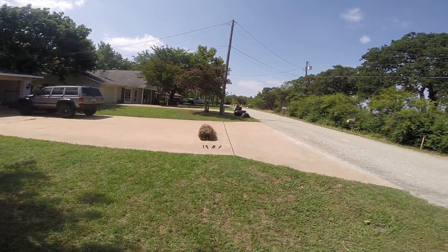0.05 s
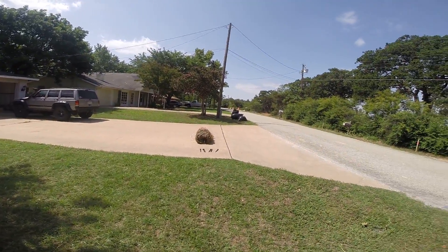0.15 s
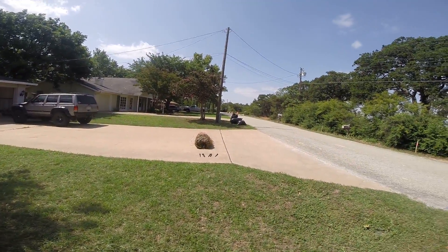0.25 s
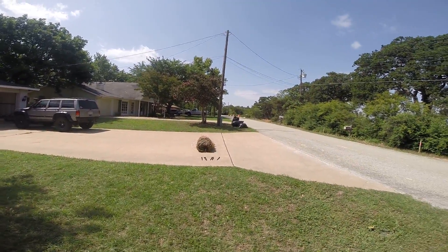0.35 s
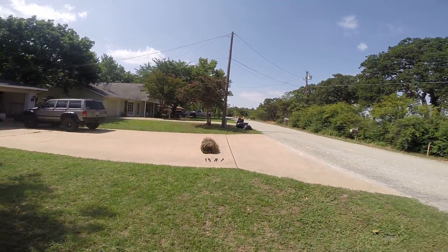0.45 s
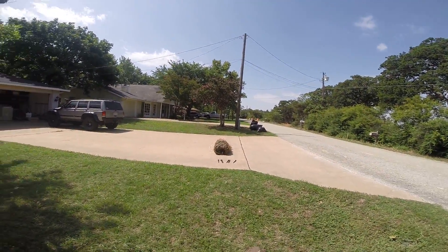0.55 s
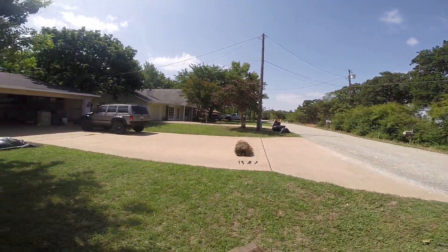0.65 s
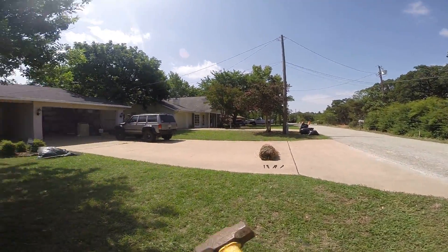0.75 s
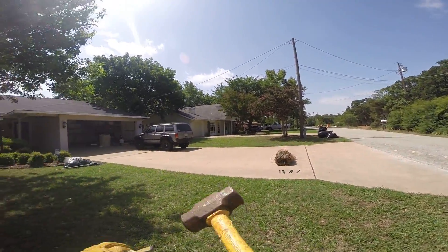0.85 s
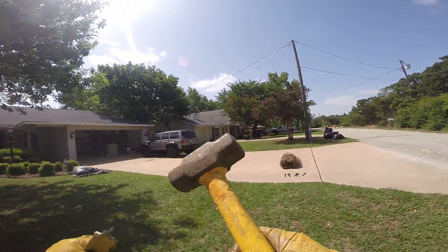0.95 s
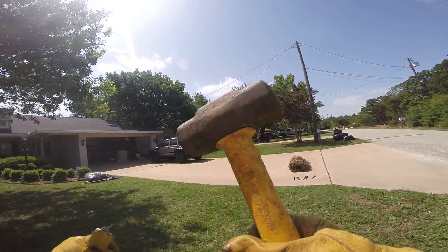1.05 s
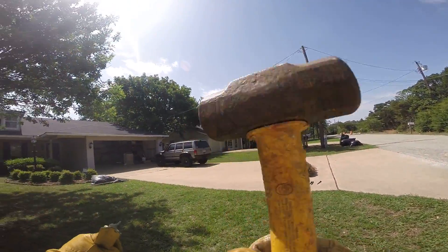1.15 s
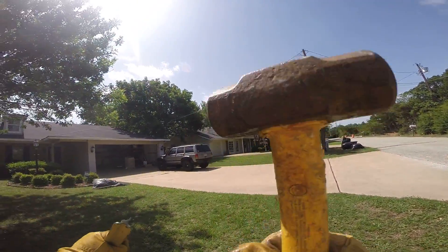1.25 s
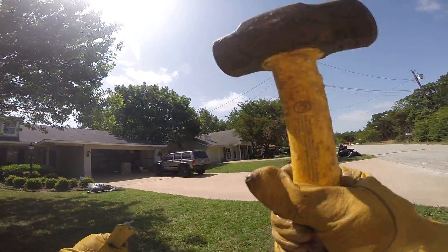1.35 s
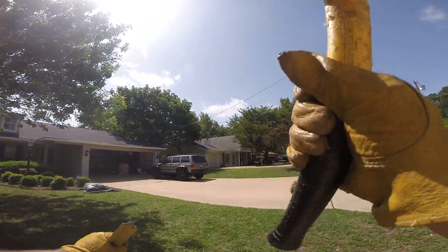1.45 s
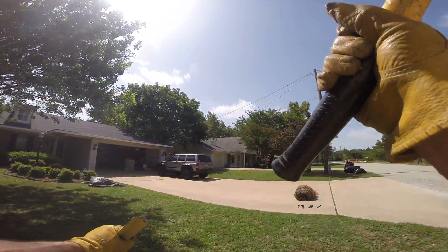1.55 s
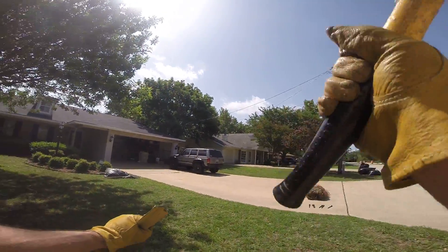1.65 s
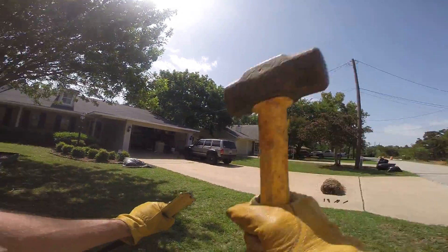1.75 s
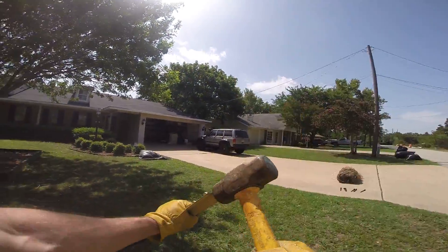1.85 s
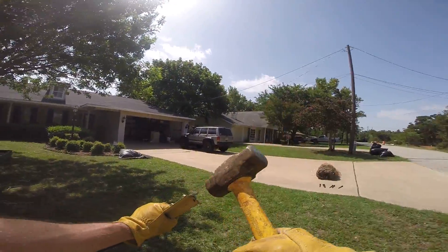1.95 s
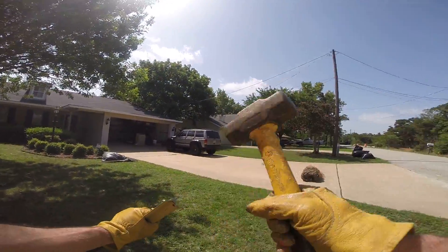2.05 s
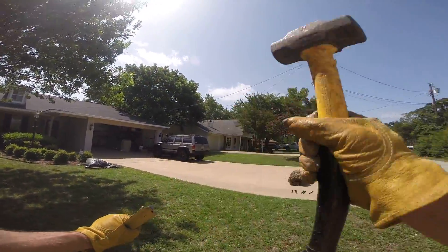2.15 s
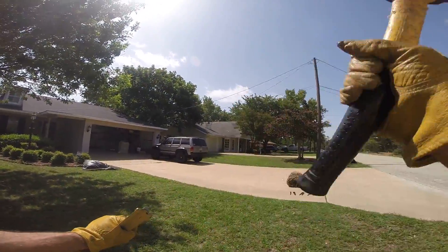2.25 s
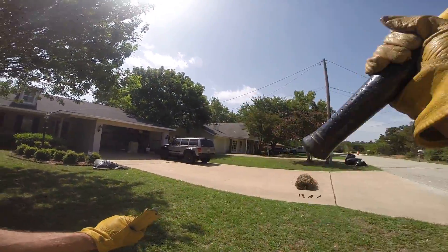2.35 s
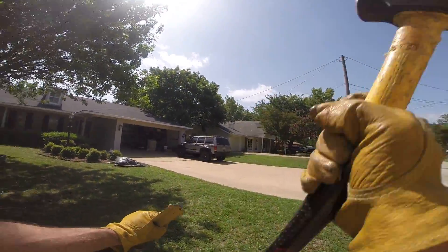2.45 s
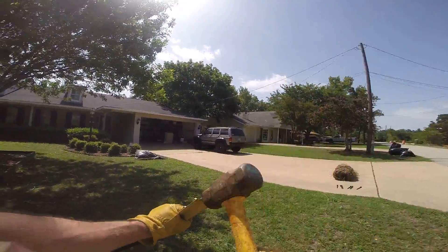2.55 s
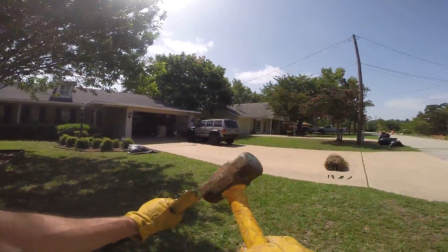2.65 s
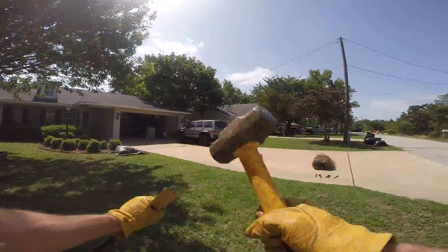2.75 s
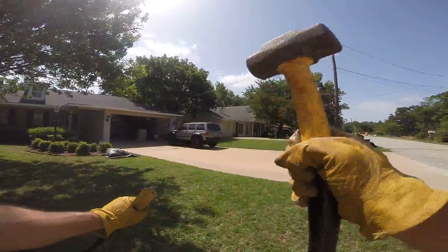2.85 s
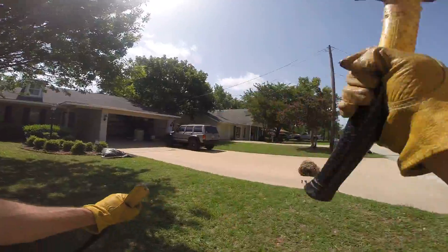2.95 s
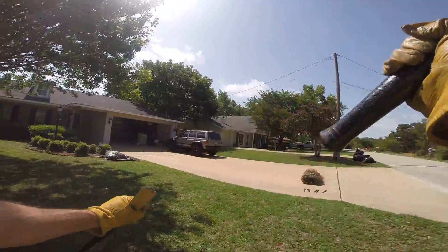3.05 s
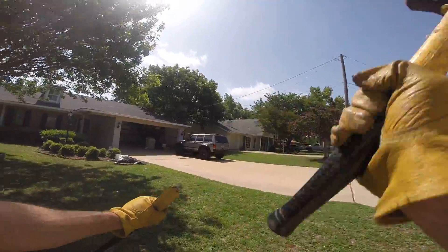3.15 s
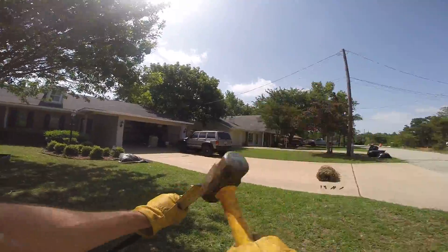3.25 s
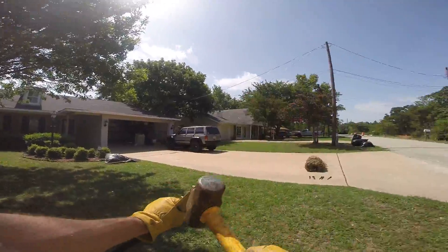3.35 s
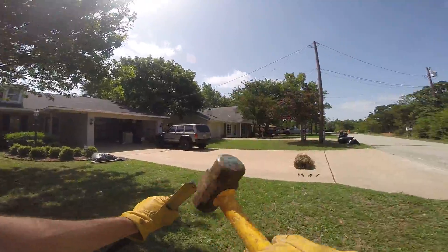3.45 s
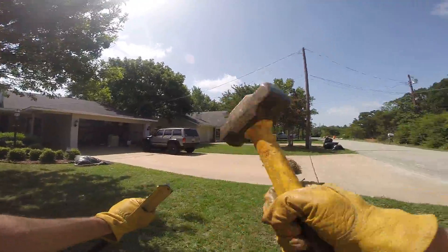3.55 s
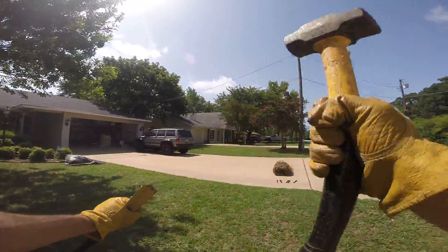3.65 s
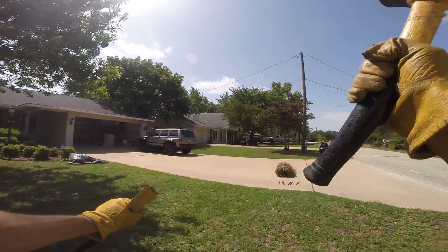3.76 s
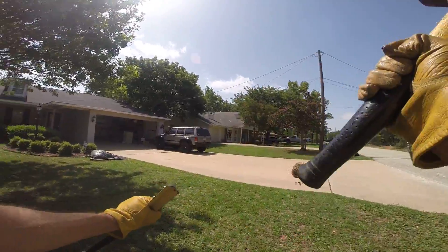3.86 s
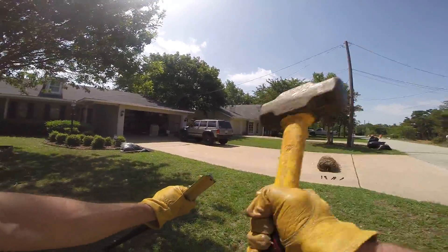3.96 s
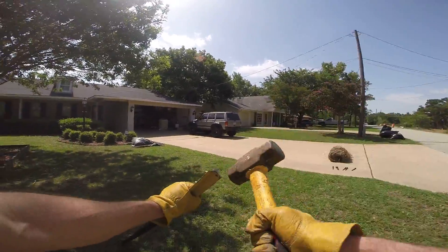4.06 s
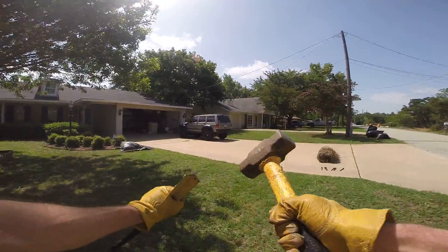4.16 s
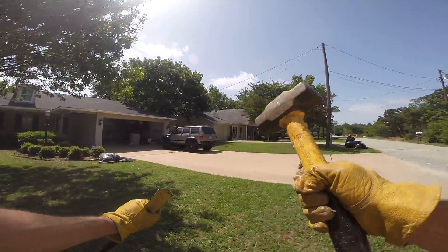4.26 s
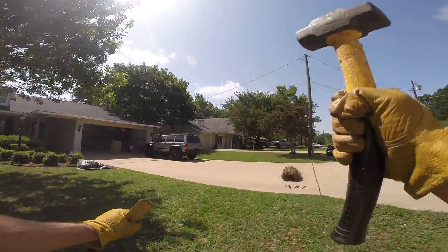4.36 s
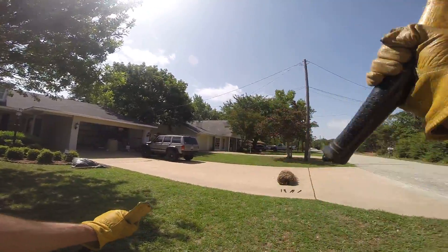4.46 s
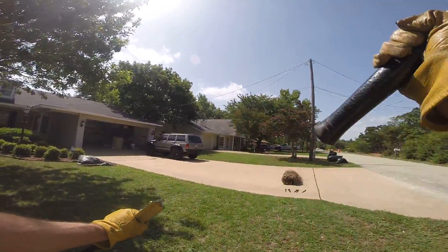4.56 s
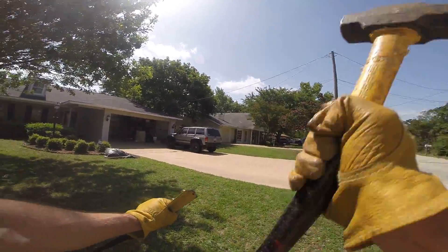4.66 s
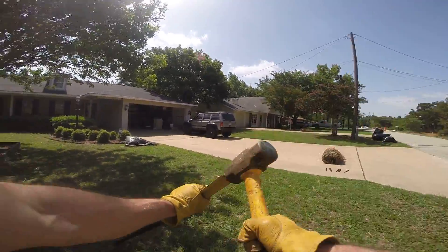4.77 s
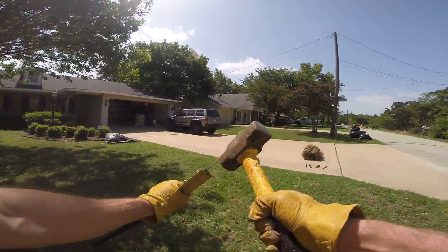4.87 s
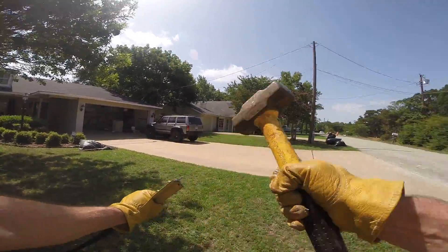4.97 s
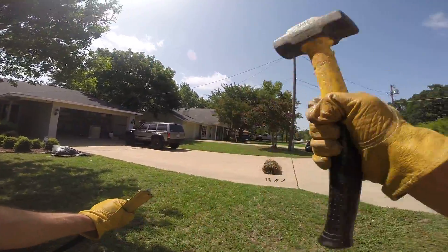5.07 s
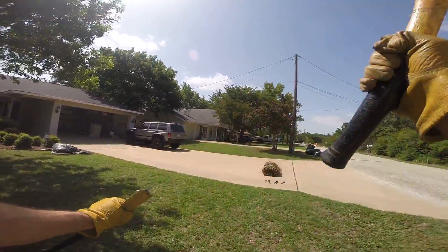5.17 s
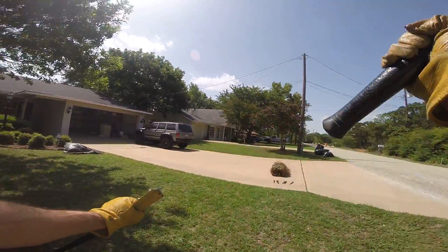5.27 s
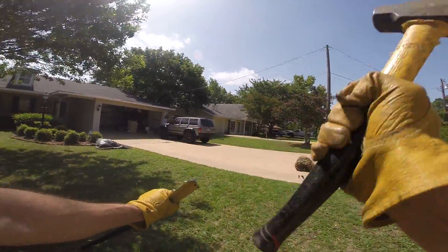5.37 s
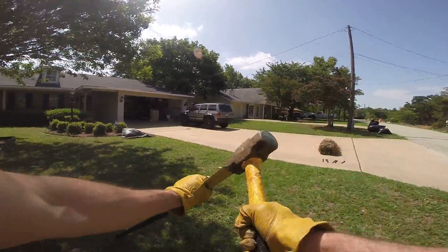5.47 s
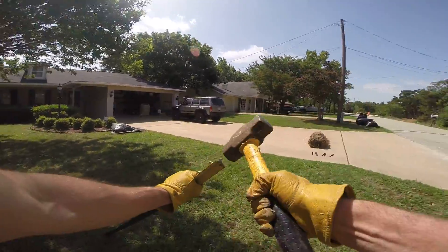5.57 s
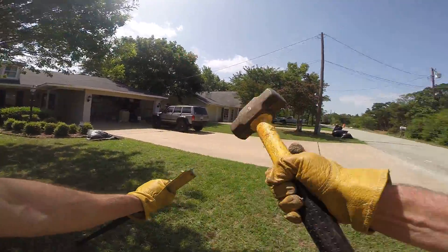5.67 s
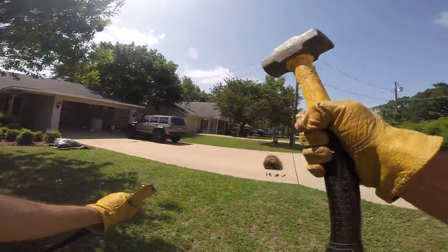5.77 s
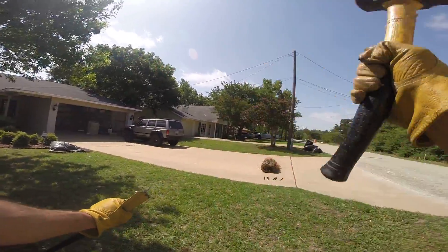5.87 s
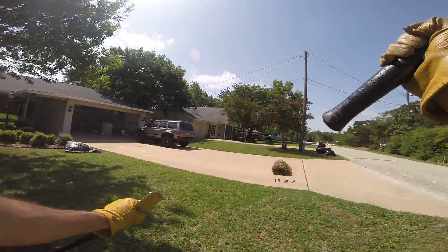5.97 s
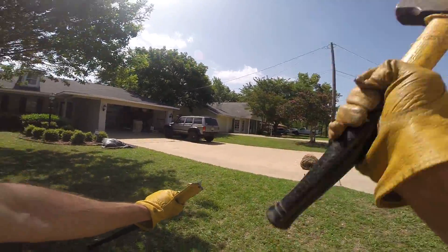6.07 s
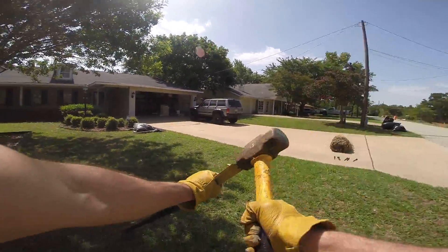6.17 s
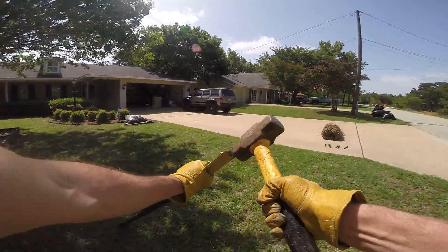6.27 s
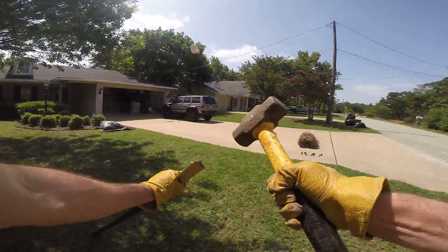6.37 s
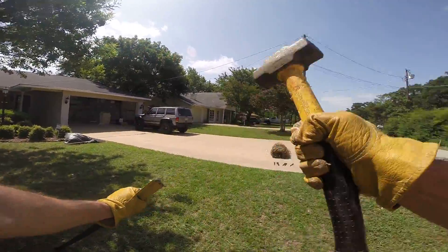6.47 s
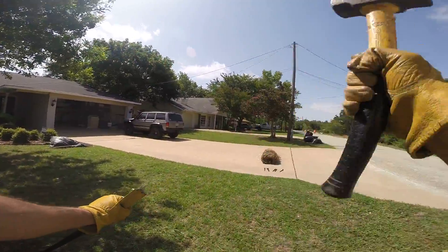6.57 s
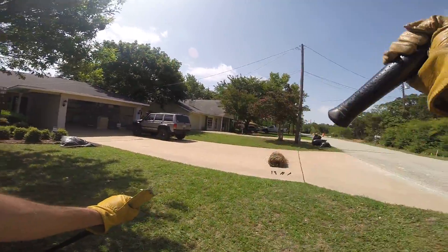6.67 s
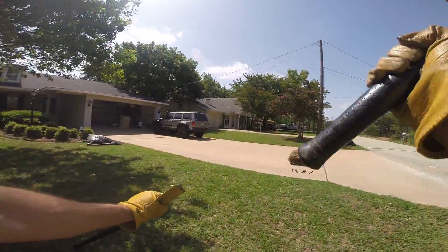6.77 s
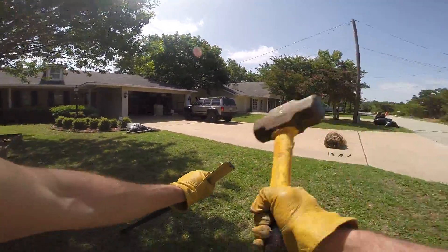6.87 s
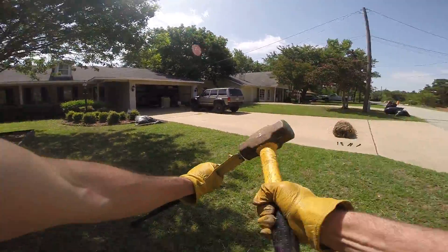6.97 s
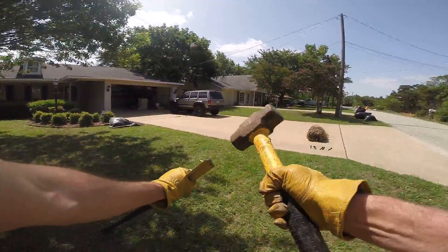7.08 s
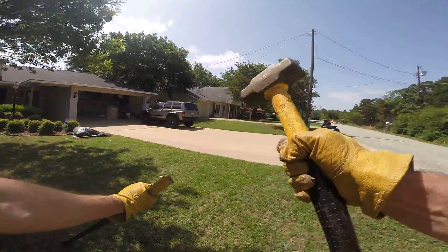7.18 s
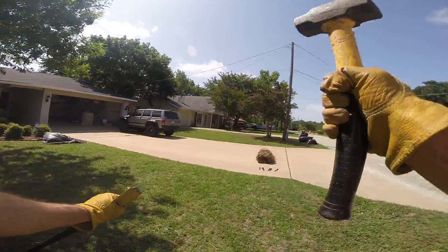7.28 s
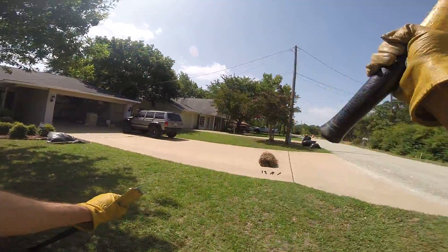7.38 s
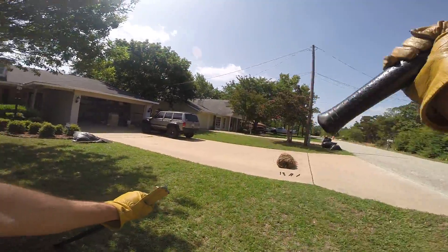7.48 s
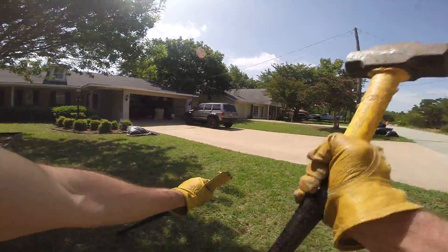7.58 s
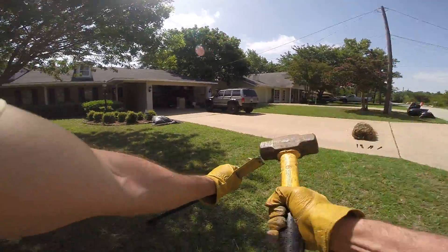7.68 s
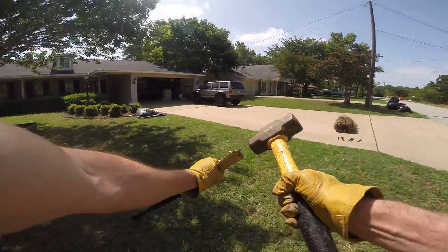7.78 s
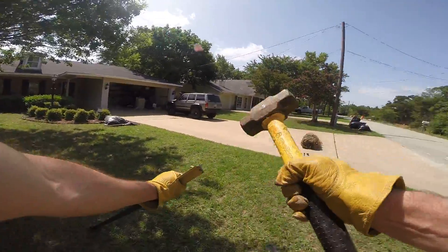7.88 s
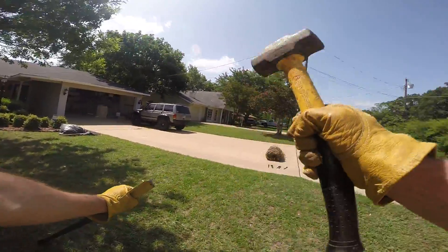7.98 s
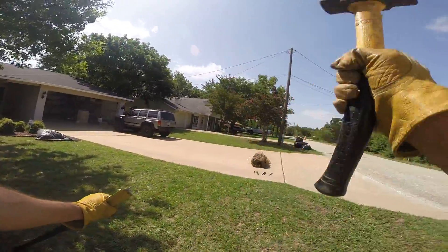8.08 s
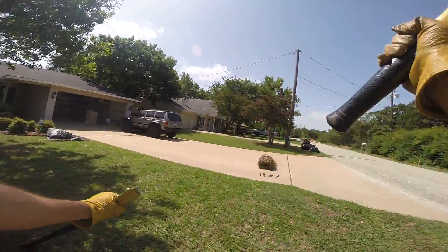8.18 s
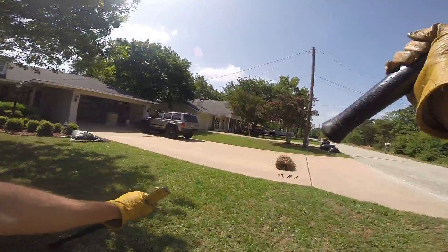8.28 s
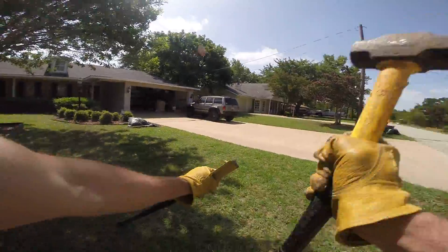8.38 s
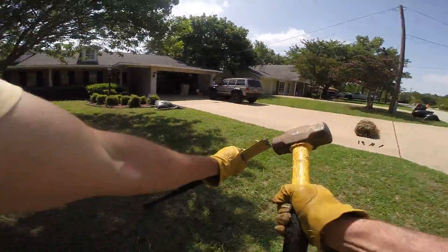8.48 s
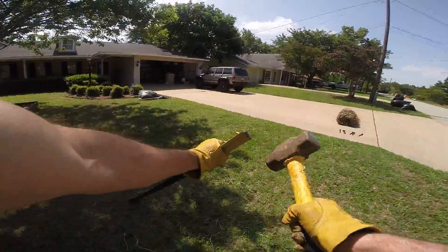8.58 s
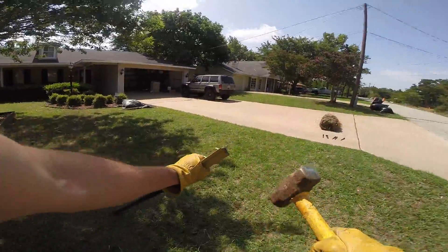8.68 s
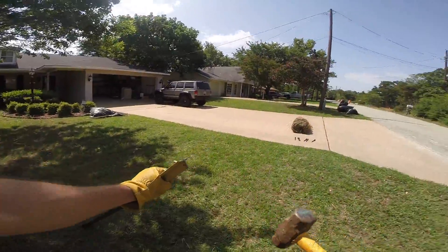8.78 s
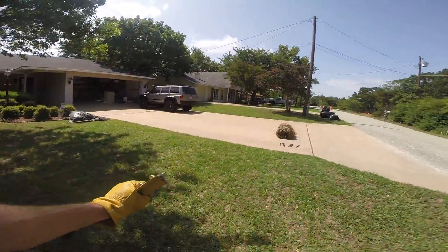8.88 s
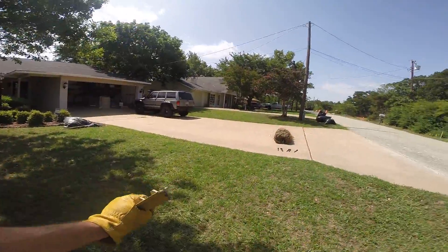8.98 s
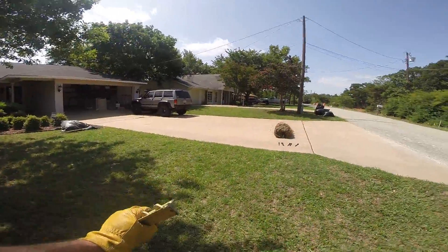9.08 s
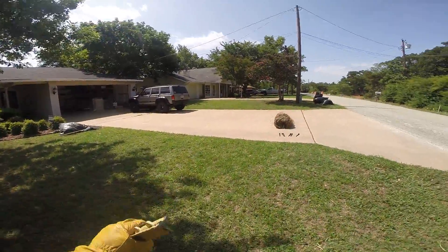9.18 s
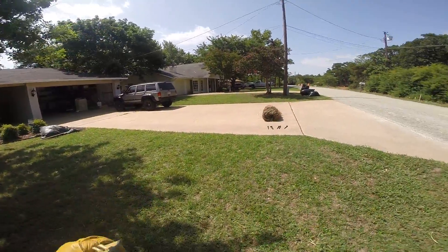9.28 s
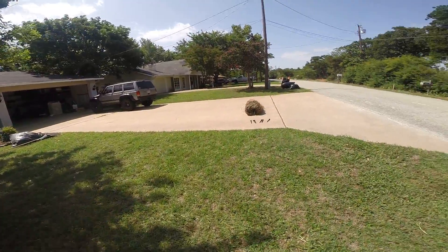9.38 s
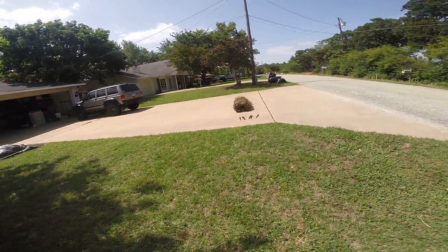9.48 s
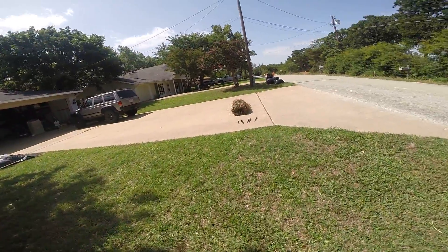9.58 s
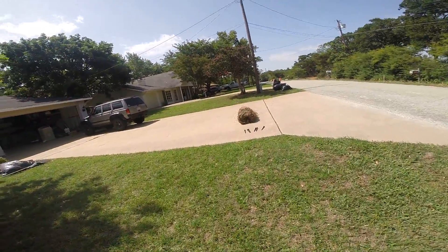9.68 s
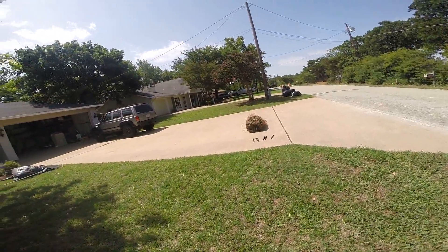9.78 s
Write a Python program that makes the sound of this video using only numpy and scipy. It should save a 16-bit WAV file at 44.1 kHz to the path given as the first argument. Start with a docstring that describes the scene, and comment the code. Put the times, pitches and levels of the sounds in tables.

```python
"""Ten chattering clanks with short rings: a sledgehammer drives a steel post into a lawn.
Noise and fading sines make each blow, damped by soil and a gloved hand; houses and trees echo it.
A camera worn on the body hears it: low thumps and ticks of its mount, swells of air at each swing, rubbing cloth.
Gliding tones make thin bird notes and far caws; steady shaped noise is the quiet wash of the street."""
import sys
import numpy as np
from scipy import signal
from scipy.fft import rfft, irfft, next_fast_len
from scipy.io import wavfile
from scipy.ndimage import uniform_filter1d

SR = 44100
rng = np.random.default_rng(int(sys.argv[2]) if len(sys.argv) > 2 else 0)


def put_to_file(sound):
    """Save the sound as 16-bit audio at rate SR, in the file named by the first command-line argument."""
    columns = np.atleast_2d(sound).T  # one column per channel
    safe = np.clip(columns, -1, 1)
    whole_steps = np.round(safe * 32767)
    wavfile.write(sys.argv[1], SR, whole_steps.astype(np.int16))


N = 433503  # length of the scene [samples]


def amp(db):
    """Turns decibels into a plain multiplier."""
    return 10 ** (np.asarray(db) / 20)


def unit(x):
    """Scales a signal to an average (rms) strength of 1."""
    return x / np.sqrt(np.mean(x ** 2) + 1e-20)


def read(points, hz):
    """Reads a table between its points, with pitch spaced as the ear hears it (log frequency)."""
    f, value = np.transpose(points)
    return np.interp(np.log(hz + 1), np.log(f + 1), value)


def add(mix, s, sound):
    """Mixes a sound in, starting at time s [s]."""
    part = mix[max(round(s * SR), 0):][:len(sound)]
    part += sound[:len(part)]


def noise(colour, size, tilt_db=0):
    """Noise of rms 1 with a given spectrum, tilted around 3 kHz by tilt_db [dB per octave]."""
    padded = 2 * next_fast_len(size // 2 + 1)
    hz = np.fft.rfftfreq(padded, 1 / SR)
    octaves = np.log2(np.maximum(hz, 1000) / 3000)  # the tilt stops changing below 1 kHz
    spectrum = rfft(rng.standard_normal(padded))
    shaped = spectrum * amp(read(colour, hz) + tilt_db * octaves)
    return unit(irfft(shaped)[:size])


def fade(x, t60):
    """Lets each pitch band die at its own speed: t60 is the time to fall 60 dB."""
    hz, t, z = signal.stft(x, SR, nperseg=128)
    dying = amp(-60 * t / read(t60, hz)[:, None])
    return signal.istft(z * dying, SR, nperseg=128)[1][:len(x)]


def smooth_random(length, size):
    """Slow random drift of rms 1, averaged over size samples."""
    return unit(uniform_filter1d(rng.standard_normal(length), size))


def waver(size):
    """Even smoother random drift of rms 1 over the whole scene, averaged twice."""
    return unit(uniform_filter1d(uniform_filter1d(rng.standard_normal(N), size), size))


# the blows; levels adjust each part of the sound: (time [s], clank level [dB], ring level [dB],
# clank treble tilt [dB per octave], rebound level [dB], extra level of the lowest mode [dB], crack level [dB],
# air of the downswing [dB], air of the follow-through [dB], recoil of the camera [dB])
BLOWS = [(1.8926, -2, 1.5, -1, 1.5, 7, 6.5, -39, -29, -43),
         (2.6310, 1, 4, -0.5, -1.5, -2, 4, -35.5, -21.5, -21),
         (3.3433, -4, -2.5, -1.5, 5, 14.5, 6, -34, -15, -25),
         (4.0786, 3, -3, -2.1, -8, -2, -6.5, -30.5, -29.5, -21),
         (4.823, 1, 0.5, 0, -8, -12, 3.5, -30.5, -33, -20.5),
         (5.5478, 1.5, -1, -0.5, -5.5, -17, -8.5, -32, -29.5, -24),
         (6.2536, 1, 0.5, 0, -6.5, -6, -5, -37, -28.5, -24.5),
         (6.9865, 2, 0, -0.2, -1.5, -12.5, 1, -29, -31, -24),
         (7.7198, -0.5, -6, 1, -10.5, -10, 0.5, -34, -35, -32),
         (8.5173, -3, -1.5, 0.5, -0.5, -7.5, -3.5, -33.5, -17, -25)]


def hammering():
    """Every blow of the hammer on the post, followed by its echoes."""
    out = np.zeros(N)
    for s, clank_db, ring_db, tilt_db, rebound_db, lowest_db, crack_db, *_ in BLOWS:
        hit = blow(clank_db, ring_db, tilt_db, rebound_db, lowest_db, crack_db)
        add(out, s, hit)
        add(out, s, street(hit))
    return out


# modes (ringing tones) of the post; soil and hand then shorten every fade:
# (frequency [Hz], level [dB], time to fall 60 dB [s])
POST = [(1274, -15.5, 0.25), (1528, -3.5, 0.086), (1795, -8.5, 0.2), (2000, -13, .07), (2170, -8, .04),
        (2399, 2, 0.043), (2655, -1.5, 0.18), (2930, -7.5, .09), (3090, -0.5, .055), (3168, -5.5, 0.058),
        (3573, -7.5, 0.036), (3910, -12, 0.071), (4030, -2.5, 0.14), (4712, -14, 0.067), (4900, -5.5, 0.08),
        (5426, -19.5, .12), (5550, -3, 0.04), (5770, -13.5, 0.31), (6150, -17.5, .1), (6700, -16.5, 0.056),
        (6940, -16.5, 0.14), (7280, -13, 0.08), (9340, -23.5, 0.07), (10707, -19.5, 0.14),
        (12220, -15.5, 0.038)]
# the crowd of quickly damped modes: (frequency [Hz], level [dB per Hz])
CLANK = [(150, -19), (400, -14), (800, -16.5), (1150, -6.5), (1700, -6), (2600, 3), (3300, -1), (3700, -3),
         (4600, -2), (5250, -9), (5800, -7), (7300, -9), (8000, -17.5), (11000, -18.5), (15000, -29)]
# how fast that crowd dies: (frequency [Hz], time to fall 60 dB [s])
CLANK_T60 = [(300, 0.042), (1500, 0.031), (3000, 0.049), (7000, 0.046), (14000, 0.053)]
REBOUND_S = .005  # the post springs back against the face this soon
GRIP_LOSS_DB_PER_S = 229.5  # soil and the gloved hand take this much more out of every mode


def blow(clank_db, ring_db, tilt_db, rebound_db, lowest_db, edge_db, crowd_db=-8, modes_db=-17, spread_db=1.4,
         rise_s=0.00037, twin_hz=22, twin_db=-6, push_db=-13, push_s=.0003,
         crack_db=-9, crack_hz=1950, crack_s=0.00082, grip=0.007):
    """The face hits, the post springs back against it, and the modes ring out."""
    t = np.arange(SR // 3) / SR
    out = np.zeros(len(t))
    for s, db in [(0, 0), (REBOUND_S, rebound_db)]:
        crowd = fade(noise(CLANK, size=len(t), tilt_db=tilt_db), CLANK_T60)
        add(out, s, amp(crowd_db + clank_db + db) * crowd * (1 - np.exp(-t / rise_s)))
    # the face never lands on quite the same spot, so the modes share the blow differently each time
    hz, db, t60 = np.transpose(POST)[:, :, None]
    luck, drift, split, phase, twin_phase = rng.standard_normal((5, len(POST), 1))
    hz = hz * (1 + grip * drift)  # depth and the hold of the hand retune it a little
    db = db + spread_db * luck + lowest_db * (hz == hz.min())
    # the post bends two ways: each mode beats against a close twin
    tone = np.sin(2 * np.pi * (hz * t + phase))
    twin = np.sin(2 * np.pi * ((hz + twin_hz * split) * t + twin_phase))
    dying = amp(-60 * t / t60 - GRIP_LOSS_DB_PER_S * t)
    ring = (amp(db) * dying * (tone + amp(twin_db) * twin)).sum(0)
    out += amp(modes_db + ring_db) * ring * (1 - np.exp(-t / 0.0004))
    # the struck top of the post cracks for a few cycles
    u = t / crack_s
    pitch = crack_hz * (1 + 0.033 * rng.standard_normal())
    out += amp(crack_db + edge_db) * u ** 2 * np.exp(1 - u ** 2) * np.sin(2 * np.pi * pitch * t)
    # the sudden stop of the head sends out one pressure pulse
    u = t / push_s
    return out - amp(push_db + clank_db) * u * (2 - u) * np.exp(-u) * 2


# colour of the echoes from lawn and trees: (frequency [Hz], level [dB])
STREET = [(200, -12), (900, -3.5), (1500, -3), (3000, -1.5), (7000, 4.5), (9500, 3), (15000, -6)]
# how fast those echoes die: (frequency [Hz], time to fall 60 dB [s])
STREET_T60 = [(300, 0.45), (2000, 0.53), (6000, 0.46), (12000, 0.47)]
# late scatter from down the street: (frequency [Hz], level [dB])
FAR = [(300, -19.5), (1500, -16), (2800, -1.5), (4200, 0), (6000, 4.5), (8000, -15.5), (14000, 1)]
# house fronts and fences: (delay [s], level [dB], centre frequency [Hz], smear [s])
WALLS = [(0.014, -35, 4400, .02), (0.057, -36.5, 2960, 0.022), (.093, -37, 1560, 0.0024),
         (.0925, -30.5, 6400, 0.0063), (.127, -38.5, 5200, 0.0097)]


def street(x, tail_db=-20, build_s=0.006, far_db=-39, far_t60=1.8, clump_db=2.5):
    """Scatter from lawn and trees, smeared slaps from the house fronts, and a faint long tail."""
    t = np.arange(SR) / SR
    near = fade(noise(STREET, size=len(t)), STREET_T60) * (1 - np.exp(-t / build_s))
    near *= amp(clump_db * smooth_random(len(t), size=260))  # single trees and bushes
    far = noise(FAR, size=len(t)) * np.exp(-np.log(1000) * t / far_t60) * (1 - np.exp(-t / 0.12))
    echo = amp(tail_db) * near / np.linalg.norm(near) + amp(far_db) * far / np.linalg.norm(far)
    for delay, db, hz, smear in WALLS:
        colour = [(hz / 4, -25), (hz, 0), (hz * 2, -20), (hz * 4, -36)]
        slap = noise(colour, size=4096) * np.exp(-t[:4096] / smear)
        add(echo, delay, amp(db) * slap / np.linalg.norm(slap))
    return signal.fftconvolve(x, echo)


def thump(db, hz, decay):
    """One heavily damped swing of the camera mount, a low tone strongest around decay [s]."""
    t = np.arange(SR // 4) / SR
    return amp(db) * t / decay * np.exp(1 - t / decay) * np.sin(2 * np.pi * hz * t)


# each blow rocks the camera mount once
RECOIL_AFTER_S, RECOIL_HZ, RECOIL_DECAY_S = .014, 64.3, .009
# the mount knocks against its stops, and a few of its stronger sways near 55 Hz: (time [s], level [dB],
# frequency [Hz])
KNOCKS = [(1.508, -31, 55), (3.274, -26, 199), (3.369, -20, 236), (3.375, -25, 79), (4.672, -26.5, 125),
          (6.001, -28, 137), (6.131, -31.5, 173.7), (6.787, -29, 144), (7.682, -23, 186),
          (7.8357, -11, 124), (8.525, -19.5, 224), (9.04, -31, 54), (9.755, -31, 55)]
KNOCK_CYCLES = 0.29  # a knock lasts the same part of a cycle at any pitch
# sharp ticks of the housing: (time [s], level [dB], treble tilt [dB per octave])
TICKS = [(1.566, -38.5, -2.5), (1.769, -44, 5.5), (3.497, -29, -4), (6.129, -37.5, 0.5), (7.426, -44.5, 7),
         (7.683, -43, -5), (8.839, -26.5, 0)]
# colour of the housing, for ticks here and cloth hiss below: (frequency [Hz], level [dB per Hz])
HOUSING = [(100, 10.5), (180, 3.5), (400, -3), (800, -13.5), (1400, -6), (1950, -6), (2330, 3.5),
           (2800, -11.5), (4000, -15.5), (6500, -20.5), (9000, -40), (15000, -45.5)]
# the mount also sways softly at random as the body shifts
SWAYS_PER_S, SWAY_DB, SWAY_SPREAD_DB, SWAY_HZ, SWAY_DECAY_S = 1.5, -42, 2, 53, 0.018


def mount(tick_s=0.0037):
    """The worn camera recoils, knocks and sways as damped low tones, and ticks as short noise."""
    out = np.zeros(N)
    for s, *_, recoil_db in BLOWS:
        add(out, s + RECOIL_AFTER_S, thump(recoil_db, RECOIL_HZ, RECOIL_DECAY_S))
    for s, db, hz in KNOCKS:
        add(out, s, thump(db, hz, KNOCK_CYCLES / hz))
    t = np.arange(SR // 8) / SR
    for s, db, tilt_db in TICKS:
        add(out, s, amp(db) * noise(HOUSING, size=len(t), tilt_db=tilt_db) * np.exp(-t / tick_s))
    for k, (when, strength, pitch) in enumerate(2 * rng.random(size=(30, 3)) - 1):
        sway = thump(SWAY_DB + SWAY_SPREAD_DB * strength, SWAY_HZ * (1 + .2 * pitch), SWAY_DECAY_S)
        add(out, (k + .5 + .5 * when) / SWAYS_PER_S, sway)
    return out


# colour of moving air: (frequency [Hz], level [dB per Hz])
AIR = [(12, -3), (28, 1), (55, -9.5), (100, -18), (200, -28), (400, -39), (1000, -72.5)]
# air builds as the arm comes down, holds until the blow, and surges once as the body follows through
DOWNSWING_S, BUILD_DB_PER_S, SETTLE_DB_PER_S = 0.13, 102, 89.5
SURGE_AFTER_S, SURGE_RISE_DB_PER_S, SURGE_FALL_DB_PER_S = 0.025, 258, 207.5
IDLE_AIR_DB = -45.5  # the breeze between swings


def air(gust_db=1.5):
    """Lumpy low noise of air on the microphone: a breeze, each downswing and each follow-through."""
    t = np.arange(-SR // 2, SR // 2) / SR  # 0 is the moment of the blow
    swing = amp(-BUILD_DB_PER_S * np.maximum(-t - DOWNSWING_S, 0) - SETTLE_DB_PER_S * np.maximum(t, 0))
    late = t - SURGE_AFTER_S
    surge = amp(np.minimum(SURGE_RISE_DB_PER_S * late, -SURGE_FALL_DB_PER_S * late))
    power = np.full(N, amp(IDLE_AIR_DB) ** 2)
    for s, *_, swing_db, surge_db, _ in BLOWS:
        add(power, s + t[0], (amp(swing_db) * swing) ** 2 + (amp(surge_db) * surge) ** 2)
    gusts = unit(amp(gust_db * waver(size=1800)))
    return noise(AIR, size=N) * np.sqrt(power) * gusts


def press(length, db):
    """The pressure of one brush swells and lets go."""
    return amp(db) * np.sin(np.linspace(0, np.pi, int(length * SR)))


# cloth drags over the housing: (time [s], length [s], hiss level [dB], note level [dB])
DRAGS = [(0.764, .06, -51, -76), (1.582, 0.14, -56, -59), (1.845, 0.11, -74, -45.5),
         (2.315, 0.13, -69, -63), (3.08, 0.11, -74, -61.5), (3.827, 0.52, -68, -63),
         (7.252, 0.11, -55, -58), (7.562, 0.057, -54, -54), (7.667, 0.056, -60, -51.5),
         (8.059, 0.042, -59, -55.5), (8.367, 0.074, -62, -55.5), (8.77, 0.16, -54, -53.5),
         (9.227, 0.32, -39.5, -50), (9.484, 0.088, -37.5, -51)]
# the housing's own note: (frequency [Hz], level [dB per Hz])
SHELL = [(100, -15.5), (800, -4.5), (1800, -9), (2150, 3), (2350, 9), (2600, -17), (3200, -17.5),
         (6500, -27), (15000, -45.5)]
CLOTH_DB, CLOTH_NOTE_DB, CLOTH_SWELL_DB = -67, -66.5, 3.5  # the faint, restless rustle that never stops


def cloth(grain_db=2.5):
    """Shirt and strap rub the housing: a grainy hiss and the housing's own note, both shaped noise."""
    restless = unit(amp(CLOTH_SWELL_DB * waver(size=3500)))
    hiss, note = amp(CLOTH_DB) * restless, amp(CLOTH_NOTE_DB) * restless
    for s, length, hiss_db, note_db in DRAGS:
        add(hiss, s, press(length, hiss_db))
        add(note, s, press(length, note_db))
    grain = unit(amp(grain_db * waver(size=150)))  # cloth sticks and slips
    return (noise(HOUSING, size=N) * hiss + noise(SHELL, size=N) * note) * grain


# far cawing calls: (time [s], length [s], highest pitch [Hz], level [dB])
CAWS = [(6.672, 0.15, 524, -52.5), (9.06, .13, 505, -50), (9.712, 0.091, 500, -50.5)]
# thin whistled notes and chirps: (time [s], length [s], start pitch [Hz], end pitch [Hz], level [dB])
NOTES = [(0.084, 0.13, 1850, 1980, -68), (.35, 0.11, 1850, 1910, -65), (0.621, 0.19, 1820, 1940, -68),
         (1.1, .12, 1750, 1920, -71), (1.283, .09, 6780, 6660, -64), (4.362, 0.047, 2580, 2370, -57),
         (5.08, 0.04, 2810, 2350, -53.5), (5.123, .05, 2340, 2370, -56), (5.374, 0.067, 1103, 1106, -53.5),
         (5.737, 0.093, 6700, 6570, -65), (6.442, 0.11, 6700, 6600, -64)]


def birds(arch=0.084, overtone_db=-13):
    """Hoarse caws of three blurred harmonics on an arched pitch, and thin, nearly pure gliding notes."""
    out = np.zeros(N)
    for s, length, hz, db in CAWS:
        u = np.linspace(0, 1, int(length * SR))
        phase = 2 * np.pi * np.cumsum(hz * (1 - arch * (2 * u - 1) ** 2)) / SR
        # hoarseness and scatter from the trees blur each harmonic
        blur = uniform_filter1d(rng.standard_normal((3, 2, len(u))), size=300)
        blur = uniform_filter1d(blur, size=180)
        throat = np.zeros(len(u))
        for k, (level, (a, b)) in enumerate(zip([-4, 0, -3], blur), 1):
            throat += amp(level) * (a * np.sin(k * phase) + b * np.cos(k * phase))
        add(out, s, amp(db) * unit(throat) * np.sin(np.pi * u))
    for s, length, start_hz, end_hz, db in NOTES:
        u = np.linspace(0, 1, int(length * SR))
        jitter = smooth_random(len(u), size=100)
        glide = (start_hz + (end_hz - start_hz) * u) * (1 + 0.0046 * jitter)
        phase = 2 * np.pi * np.cumsum(glide) / SR
        whistle = unit(np.sin(phase) + amp(overtone_db) * np.sin(2 * phase))
        add(out, s, amp(db) * whistle * np.sin(np.pi * u))
    return out


# distant outdoor wash: (frequency [Hz], level [dB per Hz])
HUSH = [(59, -31.5), (100, 0.5), (253, -5.5), (394, -10.5), (682, -13), (917, -17), (2000, -19),
        (2320, -19.5), (2930, -23), (5070, -27.5), (12800, -39.5), (13900, -42.5), (15500, -34)]
HUSH_DB = -55


def hush():
    """The quiet, steady wash of the street: noise with a fixed colour."""
    return amp(HUSH_DB) * noise(HUSH, size=N)


def scene():
    """The work, the camera's own noises and the birds over the wash of the street."""
    return (hammering() + mount() + air() + cloth() + birds() + hush())[None]


EDGE_HZ = 15400  # little is heard above this


def record(dry, ceiling=1.0):
    """Rounds off the loudest peaks at full scale, then limits the band."""
    rounded = dry / (1 + (dry / ceiling) ** 4) ** .25
    lowpass = signal.firwin(255, EDGE_HZ, window=("kaiser", 9), fs=SR)
    return signal.oaconvolve(rounded, lowpass[None], "same")


dry = scene()
out = record(dry)
put_to_file(out)
```